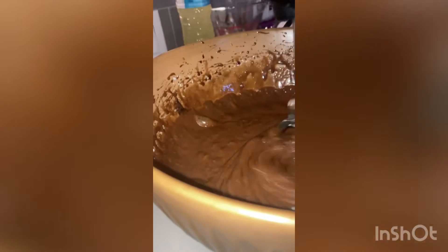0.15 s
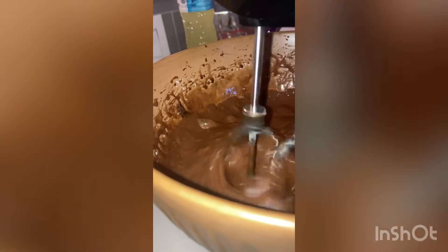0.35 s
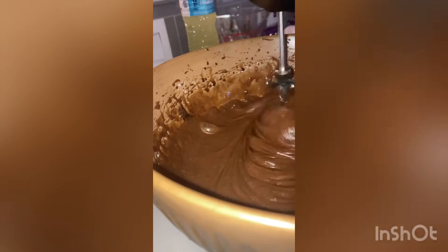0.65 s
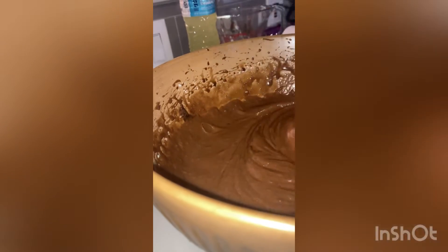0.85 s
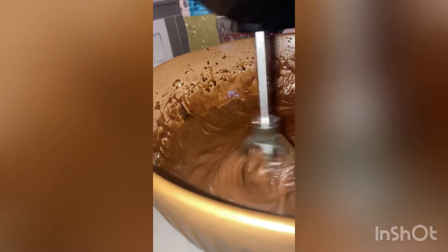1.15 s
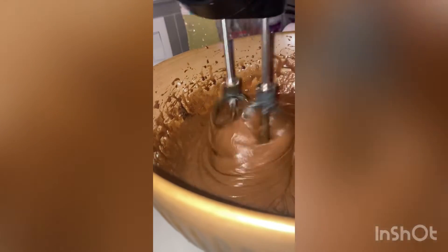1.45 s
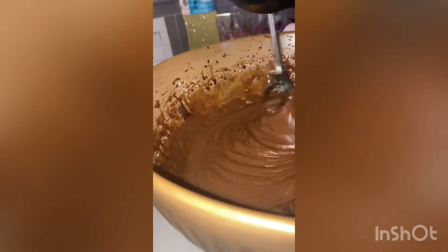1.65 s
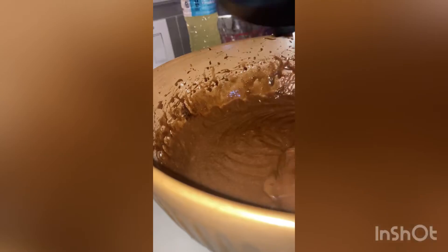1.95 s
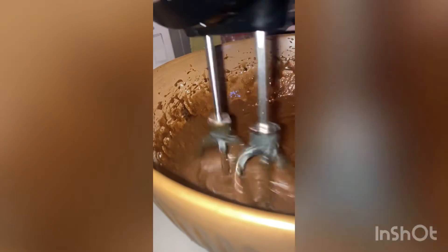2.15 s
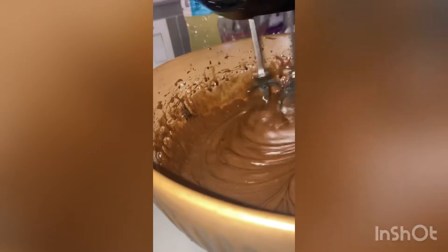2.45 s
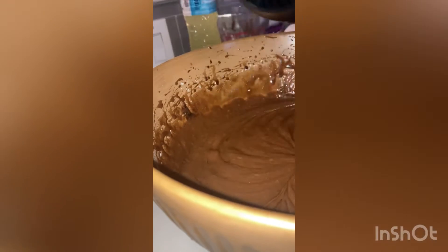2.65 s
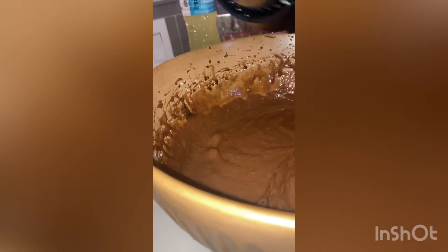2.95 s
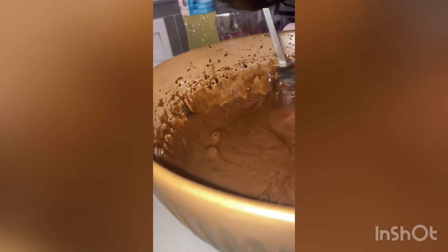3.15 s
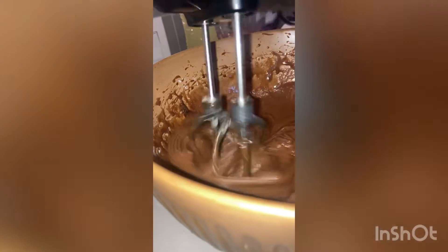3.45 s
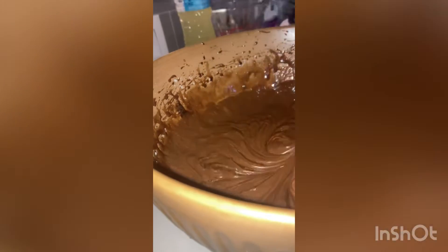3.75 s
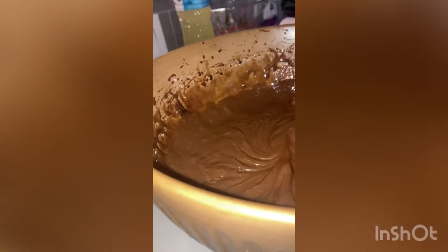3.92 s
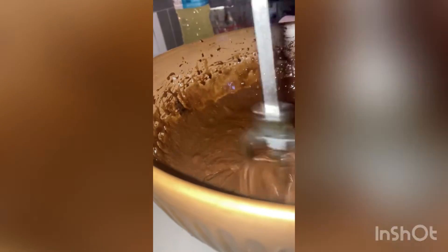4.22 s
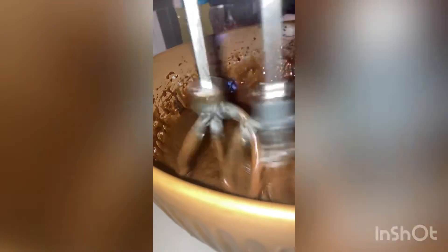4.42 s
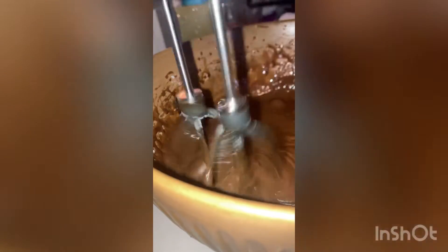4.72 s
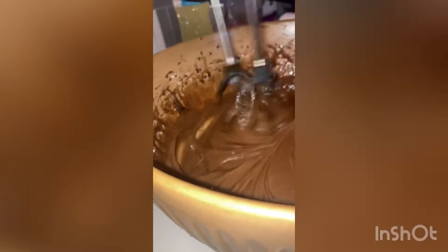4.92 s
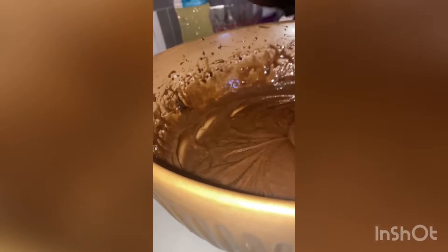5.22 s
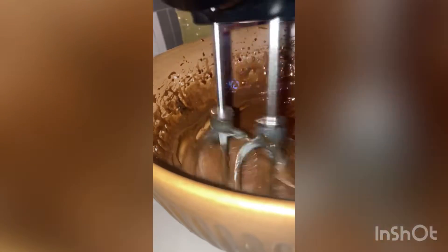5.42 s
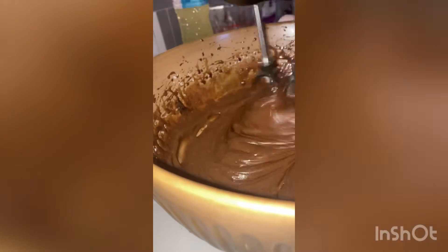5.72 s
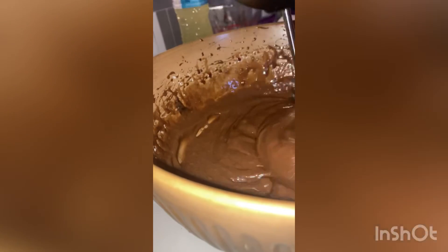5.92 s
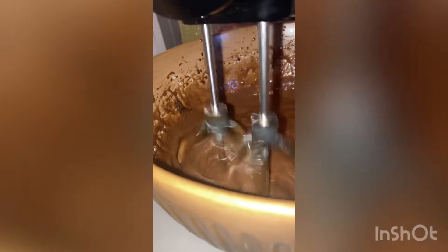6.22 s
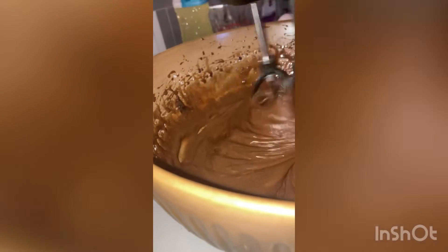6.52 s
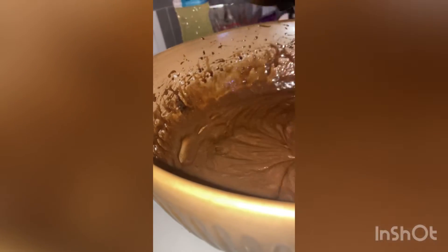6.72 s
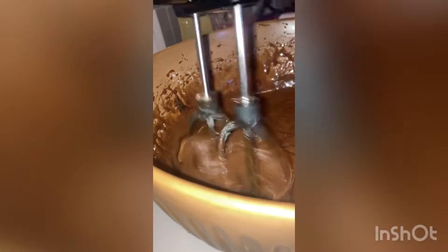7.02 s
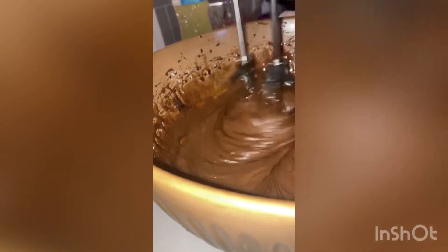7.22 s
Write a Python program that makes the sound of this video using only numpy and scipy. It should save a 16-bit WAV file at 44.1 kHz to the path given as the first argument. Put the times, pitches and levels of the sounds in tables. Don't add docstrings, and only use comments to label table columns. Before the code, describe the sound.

Continuous electric mixer motor, close and dry: a nasal whine with a fast throb, broad hiss and grinding gears, swelling and fading as it moves round. Underneath, wet thick batter churns and low handling bumps shake the bowl. Dull hollow knocks of beaters on the bowl come in irregular flurries, strongest near three, five and seven seconds, with bright clicks between; about six seconds it is mostly motor.

```python
import sys
import numpy as np
from scipy import signal
from scipy.fft import rfft, irfft, next_fast_len
from scipy.io import wavfile
from scipy.ndimage import uniform_filter1d, map_coordinates

SR = 44100
rng = np.random.default_rng(int(sys.argv[2]) if len(sys.argv) > 2 else 0)


def invert_db(x):
    u = np.asarray(x, float) / 20
    return 10 ** u


def transcribe(u):
    v = np.clip(np.atleast_2d(u).T, -1, 1)
    q = np.round(v * 32767).astype(np.int16)
    wavfile.write(sys.argv[1], SR, q)


N = 325017
T = np.arange(N) / SR
SIZE = next_fast_len(N + 8192)
HZ = np.arange(SIZE // 2 + 1) * SR / SIZE + 1e-3
SLOTS, THROB_HZ = 12, 120


def rms_one(x):
    return x / np.sqrt(np.mean(x ** 2) + 1e-20)


def in_time(rows):
    s, *columns = np.transpose(rows)
    return [np.interp(T, s, c) for c in columns]


def at_hz(points, hz):
    f, db = np.transpose(points)
    return np.interp(np.log(hz), np.log(f), db, left=-90, right=-90)


def bumps(s, height, half_s):
    coarse = T[::64, None]
    swells = np.sum(height * np.exp(-((coarse - s) / half_s) ** 2), axis=1)
    return np.interp(T, coarse[:, 0], swells)


def drift(rate):
    knots = rng.standard_normal(800)
    return map_coordinates(knots, [T[::32] * rate * 2], order=2).repeat(32)[:N]


def ring(clicks, hz, t60):
    r, w = invert_db(-60 / (t60 * SR)), 2 * np.pi * hz / SR
    return signal.lfilter([0, np.sin(w)], [1, -2 * r * np.cos(w), r * r], clicks + 1e-18)


def band_pass(x, order, low_hz, high_hz):
    return signal.sosfilt(signal.butter(order, [low_hz, high_hz], "band", fs=SR, output="sos"), x)


def noise(spectrum, patchy_db, rate, count):
    shaped = rfft(rng.standard_normal(SIZE)) * invert_db(at_hz(spectrum, HZ))
    low, high = spectrum[0][0], spectrum[-1][0]
    place = np.log(HZ / low) / np.log(high / low) * (count - 1)
    total = np.zeros(N)
    for k in range(count):
        band = irfft(shaped * np.clip(1 - abs(place - k), 0, 1), SIZE)[:N]
        total += band * invert_db(patchy_db * drift(rate))
    return rms_one(total)


# time_s, pitch_hz
SPEED = [(0, 1878), (.28, 1908), (.88, 1837), (1.31, 1900), (2.0, 1836), (2.45, 1858), (2.9, 1813),
         (3.585, 1853), (3.66, 1830), (4.05, 1863), (4.32, 1868), (4.65, 1941), (4.95, 1938), (5.32, 1858),
         (5.68, 1890), (6.42, 1908), (7.15, 1887), (7.37, 1854)]
# centre_s, pitch_change_hz, half_length_s
LOADS = [(.12, 8, .08), (.68, -7, .1), (.9, -5, .06), (1.63, -14, .11), (2.0, -9, .09), (2.15, 4, .05),
         (3.42, -10, .08), (4.24, -8, .06), (4.42, 12, .06), (5.1, -16, .08), (5.36, -7, .05),
         (6.0, -5, .06), (7.0, 5, .06), (7.28, 10, .05), (3.0, 5, .06), (3.3, -6, .17), (3.82, -4, .08),
         (4.52, 10, .06), (4.8, -17, .07), (5.89, -16, .16), (6.75, -17, .17)]


def slot_hz():
    s, hz = np.transpose(SPEED)
    index = np.arange(len(s))
    place = np.interp(T, s, index)
    share = place % 1
    eased = place - share + share ** 2 * (3 - 2 * share)
    return np.interp(eased, index, hz) + bumps(*np.transpose(LOADS))


# time_s, whine_level_db, right_phase_rad
FACING = [(0, -37, -0.3), (.48, -27, -1.45), (.97, -24.5, -2), (1.1, -24, -1.5), (1.69, -29.5, -1.63),
          (1.93, -23.5, -2.5), (2.3, -23, -1.7), (2.58, -27.5, -2.5), (3.0, -29, -2.5), (3.33, -32.5, -1.5),
          (3.87, -26.5, -2), (4.4, -36, -1), (4.83, -27, -1.6), (5.44, -26, -1.5), (5.92, -24, -1.44),
          (6.26, -23, -2), (6.45, -29, -1.5), (7.37, -28, -1.6)]
# centre_s, depth_db, half_length_s
NULLS = [(0.772, 6.5, 0.36), (1.326, -3, 0.11), (2.034, 6.5, 0.064), (3.14, -1, 0.042), (3.368, 20, 0.024),
         (3.565, -10.5, 0.049), (3.67, 10, 0.14), (4.617, 5, 0.083), (5.117, 21, 0.13), (5.774, 12, 0.11),
         (6.048, 2.5, 0.079), (6.626, 2.5, 0.073), (0.499, -4, 0.052), (0.972, -9, 0.033),
         (2.138, -5.5, 0.019), (2.365, 5, 0.015), (3.918, -3, 0.14), (4.203, -1.5, 0.044), (4.42, -7, 0.11),
         (5.37, 5, 0.035), (5.466, -3, 0.081), (5.6, 2.5, 0.035), (7.03, 5, 0.018), (7.28, 17, 0.026)]
# centre_s, upper_line_db, lower_line_db, half_length_s
TILTS = [(0.247, 5, -0.5, 0.23), (0.58, 8, 7, 0.08), (1.338, 4, 6, 0.18), (2.267, 11.5, -7, 0.27),
         (2.951, 4, 11, 0.12), (3.29, 7.5, -2, 0.15), (3.996, 7, 8, 0.16), (4.299, 6.5, -5, 0.27),
         (4.597, 0, 18, 0.06), (5.553, 5.5, 6, 0.26), (6.21, 10, 8, 0.32), (7.05, 0, 8.5, 0.37),
         (0.88, -12, -10, 0.087), (3.07, -4, 5, 0.07), (5.15, -11, -2, 0.1), (5.37, 5, -4, 0.04),
         (5.77, -14, 3, 0.06), (6.7, 3.5, 4, 0.23), (7.33, 9, 4, 0.055)]


def whine():
    db, right = in_time(FACING)
    null_db = bumps(*np.transpose(NULLS))
    db = db - null_db
    right = right + 0.0033 * null_db
    s, upper_db, lower_db, half_s = np.transpose(TILTS)
    phase = 2 * np.pi * np.cumsum(slot_hz()) / SR + .12 * drift(25) + right * [[0], [1]]
    throb = 2 * np.pi * THROB_HZ * T
    lines = invert_db(db + 1.2 * drift(30)) * np.sin(phase)
    upper = invert_db(-42.5 + bumps(s, upper_db, half_s) + 0.52 * drift(6.9))
    lines += upper * np.sin(phase + throb)
    lower = invert_db(-44.0 + bumps(s, lower_db, half_s) + drift(16.0))
    lines += lower * np.sin(phase - throb - [[0], [.5]])
    lines += invert_db(-63 + 2.2 * drift(7.3)) * np.sin(2 * phase - throb)
    pan_db = 0.36 + 3.0 * drift(6.3)
    return np.sqrt(2) * lines * invert_db(2.0 + pan_db * [[.5], [-.5]])


# time_s, level_db
NEAR = [(0, -31.5), (.38, -27.5), (.78, -32.5), (1.32, -27), (1.7, -32), (2.1, -27.5), (2.6, -32),
        (3.02, -29.5), (3.36, -33), (3.59, -28.5), (3.85, -31.5), (4.66, -26.5), (4.92, -28.5), (5.86, -30),
        (6.24, -26), (6.58, -31), (6.9, -28), (7.37, -31)]


def nearness():
    fan_db, = in_time(NEAR)
    return fan_db, fan_db - fan_db.mean()


# multiple_of_rotor_speed, level_db
STRONG = [(7, -58), (9, -52), (10, -42), (11, -56), (13, -45), (14, -57), (15, -48), (16, -59), (17, -65),
          (19, -65), (20, -57), (21, -58), (22, -66), (23, -57), (24, -49), (25, -52), (26, -61), (27, -62),
          (28, -54), (29, -61), (30, -59), (31, -68), (32, -60), (33, -53), (35, -51), (36, -51), (37, -53),
          (38, -55), (39, -55), (40, -53), (42, -58), (44, -57), (45, -58), (46, -63), (47, -56), (48, -55),
          (50, -56), (51, -55), (52, -53), (53, -54), (54, -57), (55, -48), (56, -53), (57, -53), (58, -51),
          (59, -50), (60, -52), (61, -49), (62, -51), (63, -46), (64, -50), (65, -55), (66, -52), (67, -52),
          (70, -53), (71, -50), (74, -55), (75, -56), (76, -56), (82, -55)]


def rotor():
    count, steps, points = 100, 80, 2048
    orders = np.arange(1, count + 1)
    level_db = at_hz(FAN, orders * 156.0) - 48.5 + 2 * rng.standard_normal(count)
    for k, db in STRONG:
        level_db[int(k) - 1] = db
    wander = rng.standard_normal((2, steps, count))
    phase = rng.uniform(0, 7.75, count) + .5 * np.cumsum(wander[1], axis=0)
    gains = invert_db(level_db + 2.83 * wander[0]) * np.exp(1j * phase)
    turn = irfft(np.pad(gains, ((0, 0), (1, 0))), points) * points / np.sqrt(2)
    turns = np.cumsum(slot_hz()) / SR / SLOTS
    where = [T / T[-1] * (steps - 1), turns % 1 * (points - 1)]
    return map_coordinates(turn, where, order=1) * invert_db(-0.17 + 0.36 * nearness()[1])


def buzz():
    return np.sin(2 * np.pi * THROB_HZ * T)


# frequency_hz, density_db
FAN = [(2600, -13), (4000, -9), (4900, -10), (5500, -9), (7000, -13), (8500, -6.5), (10000, -2),
       (10600, -5.5), (11000, -4), (11700, -9), (13000, -8), (14300, -14), (15700, -16)]


def fan(flutter_db):
    level = invert_db(nearness()[0] - 1.5 + flutter_db)
    return level * (1 + 0.07 * buzz()) * noise(FAN, patchy_db=2.0, rate=5, count=16)


# frequency_hz, density_db
GEARS = [(600, -7), (800, -15), (1200, -9.5), (1520, -3.5), (1700, -4), (1960, 0), (2150, -10), (2380, -10),
         (2680, -18), (3250, -10.5), (3700, -16), (4100, -42), (5000, -31.5), (6500, -15)]


def gears(flutter_db):
    jolt_s, jolt_db = np.transpose(TICKS)[:2]
    level = invert_db(-31.5 + 0.96 * nearness()[1]) + bumps(jolt_s, invert_db(jolt_db - 29), 0.094)
    worm = np.sin(2 * np.pi * np.cumsum(slot_hz()) / SR / SLOTS)
    pulse = (1 + 0.15 * buzz()) * (1 + 0.22 * worm)
    return level * invert_db(flutter_db) * pulse * noise(GEARS, patchy_db=1.0, rate=11, count=9)


# frequency_hz, density_db
CHURN = [(100, -15), (200, -8.5), (310, -2.5), (385, -2.5), (470, 5.5), (570, -5), (800, -15.5),
         (1300, -16.5)]


def churn():
    s, blow_db = contacts()[:2]
    slop = invert_db(-36.5) + bumps(s, invert_db(.5 * blow_db - 39), 0.063)
    return slop * noise(CHURN, patchy_db=2.5, rate=20, count=5)


# frequency_hz, density_db
RUMBLE = [(24, -42), (42, -1.5), (65, 0), (115, 3.5), (170, -5.5), (300, -38)]
# centre_s, rumble_db, half_length_s
SHOVES = [(0.2, -43.5, 0.12), (.57, -41.5, 0.076), (0.897, -53, 0.089), (2.004, -41, 0.086),
          (2.253, -48, .08), (2.679, -41, 0.055), (2.994, -39.5, 0.3), (3.6, -39, 0.074),
          (4.003, -50.5, 0.74), (4.674, -51, 0.066), (5.093, -35, 0.14), (5.41, -40.5, 0.16),
          (6.05, -50, 0.074), (4.905, -49, 0.056), (1.55, -49, 0.06), (1.8, -56, 0.1), (6.272, -48, 0.053),
          (6.851, -44, 0.15), (7.249, -37, 0.19)]


def rumble():
    s, db, half_s = np.transpose(SHOVES)
    grip = invert_db(-47.5) + bumps(s, invert_db(db + 1.5), half_s)
    return grip * noise(RUMBLE, patchy_db=2.0, rate=3.6, count=3)


# start_s, peak_db, thud_centre_hz, rim_ring_db
BLOWS = [(0.853, -19, 520, 2), (1.97, -10, 430, -19), (2.059, -14.5, 633, -6), (2.653, -25, 420, 5),
         (2.767, -12, 480, -19), (2.823, -7, 450, -16), (2.859, -6, 430, -17), (2.895, -10, 430, -19),
         (3.051, -7, 398, -16), (3.102, -7, 415, -24), (3.069, -14, 450, -18), (3.194, -13.5, 520, -7),
         (3.234, -12.5, 436, -10.5), (3.569, -11.5, 536, -2.5), (4.296, -15.5, 477.5, -3),
         (4.341, -21, 502, 2.5), (4.755, -21, 514, 5), (4.825, -7.5, 315, -8), (4.88, -4.5, 319, -12),
         (4.924, -3, 293, -11), (4.971, -4, 361.5, -4), (5.022, -5, 500, -6), (5.055, -6.5, 378, -9),
         (5.314, -16, 400, -17), (6.926, -6, 390.4, -11), (7.095, -7.5, 365, -5), (7.148, -6.5, 416, -5.5),
         (7.2, -10, 481, 0.5), (7.251, -7.5, 328.6, 0), (7.298, -3, 381, -6.5), (7.338, -6, 412, -8)]
# start_s, peak_db, thud_centre_hz
FURTHER_BLOWS = [(0.823, -29, 450), (0.906, -29, 460), (1.152, -22, 460), (1.498, -22, 450), (1.597, -24, 450),
                 (1.866, -19, 450), (1.94, -20, 450), (1.99, -16, 400), (2.024, -16.5, 500), (2.146, -17.5, 520),
                 (2.214, -16.5, 480), (2.374, -20, 450), (2.63, -34, 450), (2.676, -20, 450), (2.742, -17, 450),
                 (2.92, -14, 430), (2.945, -14, 430), (2.988, -12, 415), (3.033, -33, 450), (3.118, -28, 430),
                 (3.149, -19, 470), (3.411, -28, 450), (3.45, -13.5, 520), (3.492, -15, 532), (3.531, -12, 560),
                 (3.624, -11, 300), (3.646, -10, 330), (3.707, -20, 500), (3.753, -20, 520), (3.807, -20.5, 480),
                 (3.863, -23.5, 480), (3.923, -18.5, 445), (3.968, -24, 450), (4.045, -14.5, 565),
                 (4.088, -15.5, 483), (4.12, -23, 520), (4.14, -22, 500), (4.17, -12, 520), (4.214, -10.5, 500),
                 (4.258, -13, 480), (4.394, -19, 480), (4.488, -20, 480), (4.58, -16, 480), (4.622, -19, 450),
                 (4.696, -22, 480), (5.073, -9.5, 450), (5.154, -14, 400), (5.171, -15, 520), (5.345, -13.5, 520),
                 (5.39, -16, 550), (5.497, -12, 400), (5.526, -13.5, 416), (6.117, -20, 520), (6.721, -16, 380),
                 (6.874, -21, 400), (6.897, -18.5, 500), (6.974, -11, 420), (7.038, -12.5, 450), (7.214, -10, 420),
                 (7.264, -6.5, 450)]


def contacts():
    return np.transpose(BLOWS + [(s - 0.00198, db, hz, -14) for s, db, hz in FURTHER_BLOWS])


# frequency_hz, level_db, t60_s
BOWL = [(242, -2, 0.055), (344, -7.5, 0.059), (400, 2, 0.043), (472, -1.5, 0.03), (536, 6.5, 0.025),
        (658, 7, 0.042), (695, -7.5, 0.0089)]
# frequency_hz, level_db, t60_s
RIM = [(840, -5.5, 0.017), (1108, -4.5, 0.017), (1200, -4, 0.0073), (1450, -6, 0.0086), (1630, -12, 0.0078)]


def thuds():
    s, peak_db, centre_hz, rim_db = contacts()
    shape = (len(s), 4)
    bounce = np.arange(shape[1])
    lags = np.cumsum(rng.uniform(0.00317, 0.00698, shape), axis=1)
    lags -= lags[:, :1]
    push = np.where(bounce, np.sign(rng.standard_normal(shape)), 1)
    light_db = 0.28 * (peak_db.max() - peak_db)[:, None]

    def strike(db, hz, t60, late_s, fade_db):
        clicks = np.zeros(N)
        at = np.minimum(((s[:, None] + lags + late_s) * SR).astype(int), N - 1)
        luck_db = 2.7 * rng.standard_normal(shape) / (0.5 + 0.24 * light_db)
        clicks[at] = invert_db(db[:, None] - (fade_db + light_db) * bounce + luck_db) * push
        return ring(clicks, hz, t60)

    slope_db = 10.0 + 1.55 * light_db[:, 0]
    bowl, rim = np.zeros(N), np.zeros(N)
    for hz, db, t60 in BOWL:
        mode_db = peak_db - 10.0 + db - slope_db * abs(np.log2(hz / centre_hz))
        bowl += strike(mode_db, hz, t60, 0.0029, 2.74)
    for hz, db, t60 in RIM:
        rim += strike(peak_db + rim_db + 2.0 + db, hz, t60, 0.00079, 9.4)
    return band_pass(bowl, 3, 250, 950) + band_pass(rim, 2, 750, 2000)


# start_s, peak_db, brightness_db
TICKS = [(0.853, -31, -10), (2.06, -17.5, -1), (2.268, -32, 0), (2.6545, -39, 2), (2.82, -27, 10),
         (2.9094, -21, -3), (3.012, -24, 0), (3.592, -27, 2), (3.644, -18, 0), (3.7025, -24, -7),
         (3.75, -23, 3), (3.8054, -24, 7), (4.043, -17.5, -2), (4.132, -31, 0), (4.168, -19, -6),
         (4.213, -22, -6), (4.256, -15, -5), (4.296, -16, 5.5), (4.343, -23, 9), (4.39, -16.5, -1),
         (4.401, -19, 2), (4.432, -27, 1), (4.471, -23, 7), (4.536, -25, 7), (4.581, -18, -6),
         (4.6173, -15.5, -4), (4.632, -25, 0), (4.6949, -14, 3), (4.7542, -15.5, 6), (4.812, -26, -9),
         (4.858, -31, 13), (4.9606, -30, 18.5), (5.012, -36, 0), (5.3446, -26, -5), (5.391, -19, 2),
         (2.695, -20, 0.5), (2.782, -25, -1), (2.963, -27, 0), (3.05, -39, 0), (4.571, -26, 12),
         (4.648, -16, 3), (4.526, -19.5, 6), (6.113, -17.5, 3), (3.071, -30, 13), (2.776, -25, 2),
         (2.93, -23, 2), (3.1, -33, -2), (3.195, -39, 3), (6.8933, -22, -3), (7.0356, -22.5, -2),
         (7.2393, -25, 0)]
# frequency_hz, level_db, t60_s
HOUSING = [(1390, -10, 0.016), (1866, 12.5, 0.018), (2480, -5.5, 0.038), (3080, -1, 0.0082),
           (4520, -6, 0.0082)]


def ticks():
    scrape, tail = np.zeros((3, N)), np.arange(1200)
    decay = np.exp(-tail / (0.0015 * SR)) + 1.5 * np.exp(-tail / (0.00029 * SR))
    bursts = rng.standard_normal((len(TICKS), len(tail))) * decay
    bursts *= 8.8 / np.linalg.norm(bursts, axis=1, keepdims=True)
    for (s, peak_db, bright_db), burst in zip(TICKS, bursts):
        at = round(s * SR)
        treble_db = peak_db + bright_db
        band_db = np.array([[peak_db], [treble_db + 2.5], [treble_db - 2.5]])
        scrape[:, at:at + len(tail)] += invert_db(band_db) * burst
    bands = ([1000, 2800], [2800, 5400], [6000, 12500])
    both = sum(band_pass(part, 2, *band) for band, part in zip(bands, scrape))
    return 1.37 * both + 0.12 * sum(invert_db(db) * ring(both, hz, t60) for hz, db, t60 in HOUSING)


def chatter():
    s, peak_db = np.transpose(TICKS)[:2]
    born = rng.random(N) < 320 / SR
    clicks = born * rng.standard_normal(N) * bumps(s, invert_db(peak_db - 15.5), 0.11)
    return 4.6 * band_pass(clicks, 2, 2300, 5600)


# frequency_hz, right_phase_rad, likeness_0_to_1, left_minus_right_db
PORTS = [(50, 0, .87, 3), (170, .1, .9, .5), (450, .4, .88, 2), (620, 1.7, .6, 1), (820, 3.2, .4, 3),
         (1050, 5.5, .25, 0), (1300, 7, .65, -2), (1550, 9.4, .75, -3.5), (1900, 11, .85, .5),
         (2700, 13.5, .1, -1), (3050, 16.3, .55, -5), (3800, 18, .72, -2.5), (4700, 16.8, .7, -2),
         (5650, 15.7, .8, 0), (8300, 12.6, .8, 0), (11700, 9.4, .8, 0), (15200, 6.3, .75, 0)]


def ports(x):
    hz, phase, alike, pan_db = np.transpose(PORTS)
    phase = np.interp(HZ, hz, phase)
    alike = np.interp(HZ, hz, np.clip(alike, 0, 1))
    pan_db = np.interp(HZ, hz, pan_db)
    tail = np.arange(8000)
    echoes = rng.standard_normal((6, len(tail))) * np.exp(-tail / (.02 * SR))
    echoes /= np.linalg.norm(echoes, axis=1, keepdims=True)
    shares = np.array([drift(2.5) for echo in echoes])
    shares /= np.linalg.norm(shares, axis=0)
    scattered = np.sum(rfft(shares * x, SIZE) * rfft(echoes, SIZE), axis=0)
    left = rfft(x, SIZE)
    right = alike * np.exp(1j * phase) * left + np.sqrt(1 - alike ** 2) * scattered
    return irfft([left * invert_db(pan_db / 2), right * invert_db(-pan_db / 2)], SIZE)[:, :N]


def scene():
    flutter_db = 0.45 * drift(14)
    motor = rotor() + fan(flutter_db) + gears(flutter_db)
    bowl = churn() + rumble() + thuds() + ticks() + chatter()
    return whine() + ports(motor + bowl)


# dropped_0_mid_1_side, from_hz,
# to_hz
DROPPED = [(0, 5420, 6100), (0, 11200, 12350), (1, 7600, 9000), (1, 13900, 22050), (0, 15650, 22050)]


def stronger_of_mid_and_side(x):
    hz, s, frames = signal.stft([x[0] + x[1], x[0] - x[1]], SR, nperseg=2048)
    for which, low, high in DROPPED:
        waver_hz = 160 * rng.standard_normal((2, len(s) // 2 + 1)).repeat(2, axis=1)[:, :len(s)]
        low, high = np.array([[low], [high]]) + waver_hz
        frames[int(which)] *= (hz[:, None] < low) | (hz[:, None] > high)
    power = abs(frames) ** 2
    around = uniform_filter1d(uniform_filter1d(power.sum(axis=0), size=60, axis=0), size=9, axis=1)
    share = np.interp(hz, [4200, 5200, 11000, 13000], [0, .15, .15, .33])[:, None]
    frames *= uniform_filter1d(power, size=5, axis=1) > share * around
    mid, side = signal.istft(frames, SR, nperseg=2048)[1][:, :N] / 2
    return np.array([mid + side, mid - side])


def band_limit(x):
    return signal.sosfilt(signal.butter(12, 16540, fs=SR, output="sos"), x)


def record(dry):
    rounded = .95 * np.tanh(dry / .95)
    mix = stronger_of_mid_and_side(rounded)
    return band_limit(mix)


dry = scene()
out = record(dry)
transcribe(out)
```